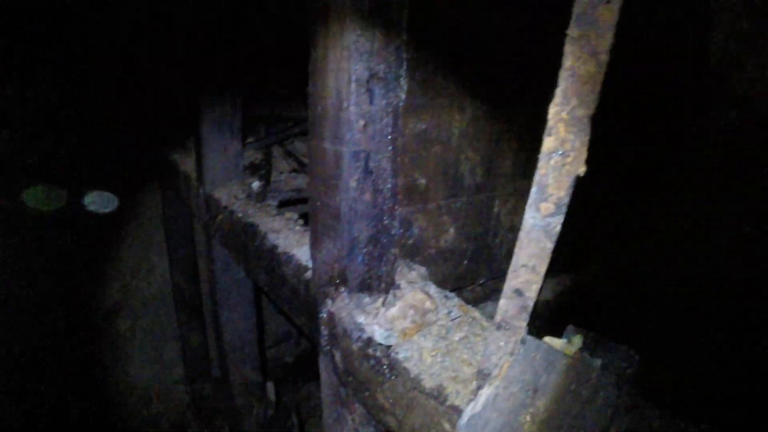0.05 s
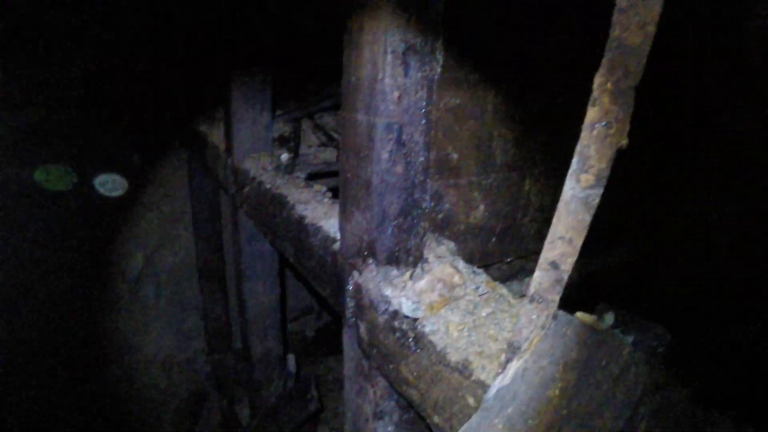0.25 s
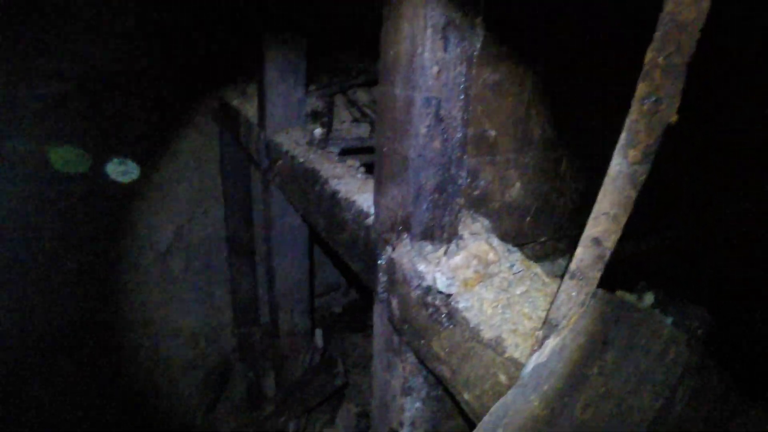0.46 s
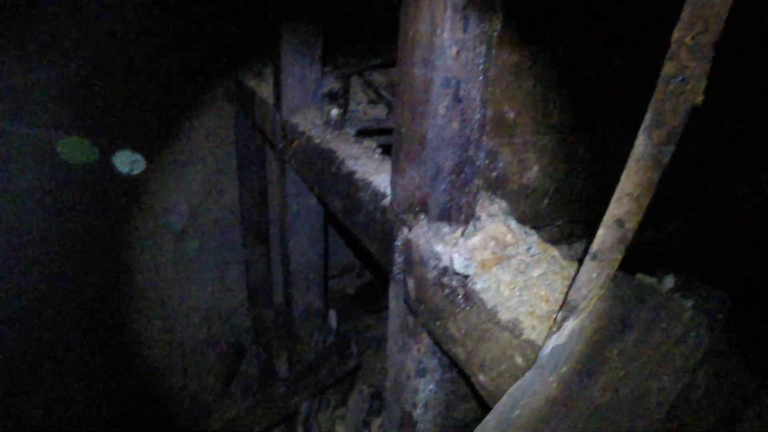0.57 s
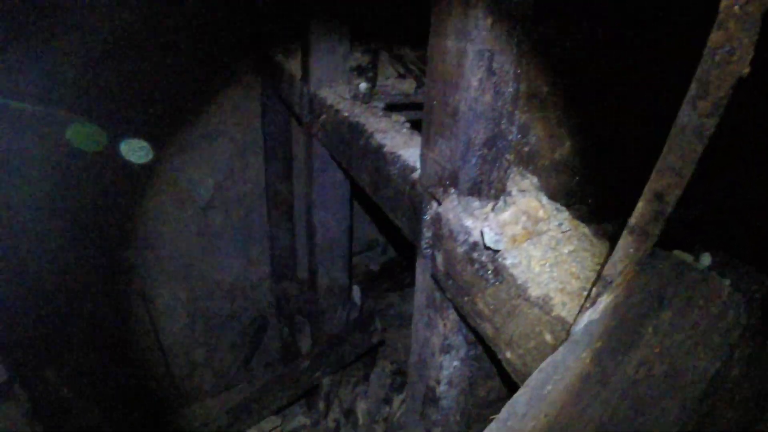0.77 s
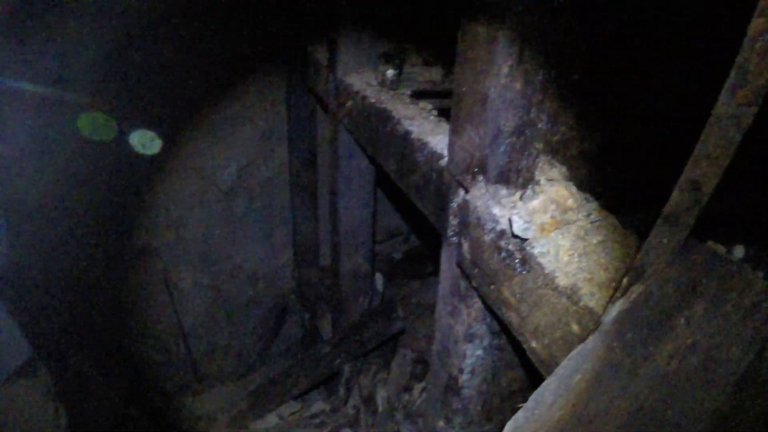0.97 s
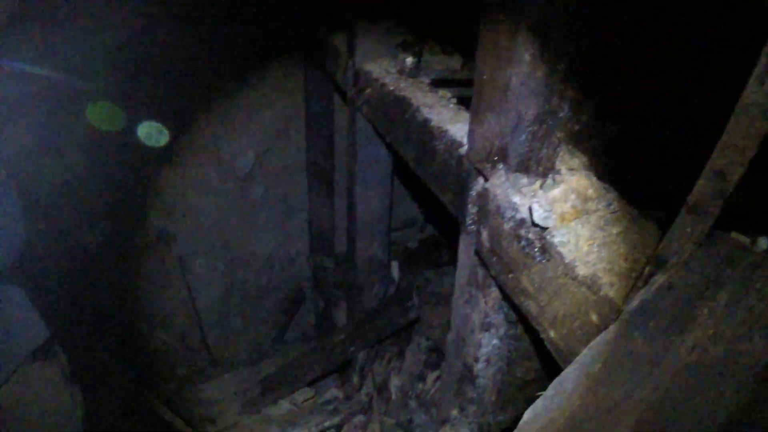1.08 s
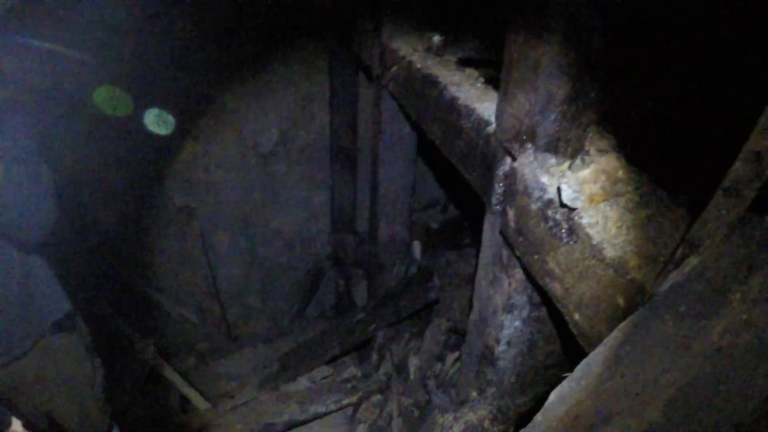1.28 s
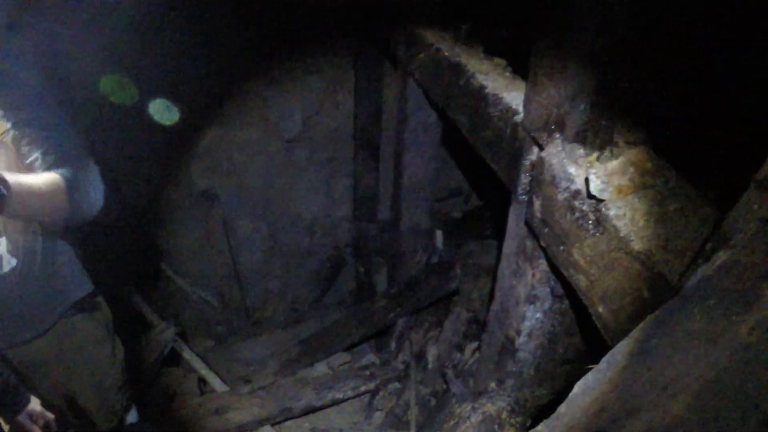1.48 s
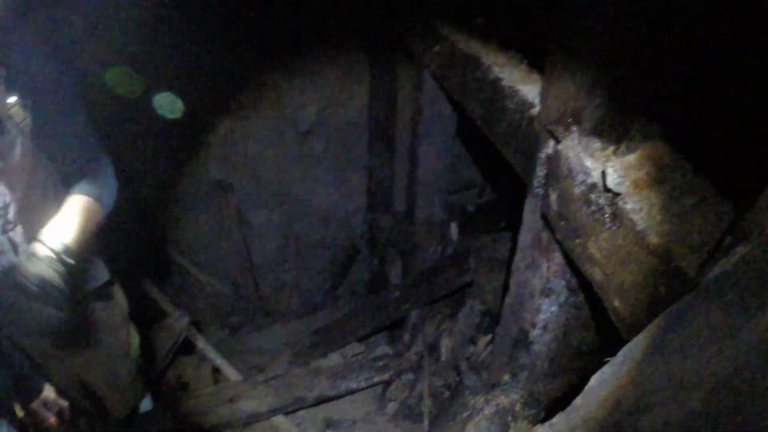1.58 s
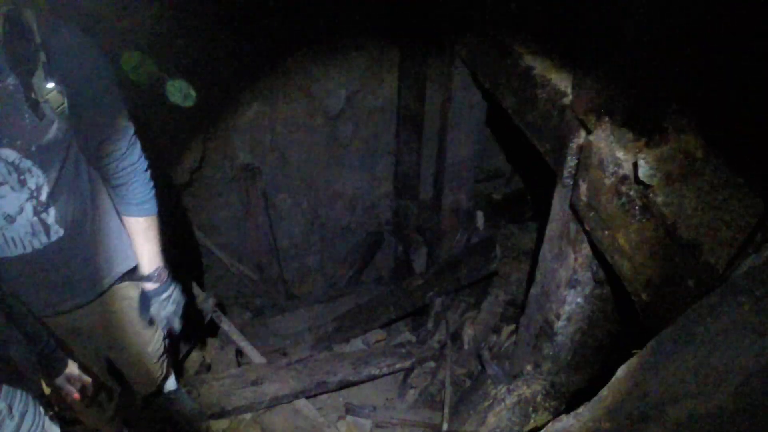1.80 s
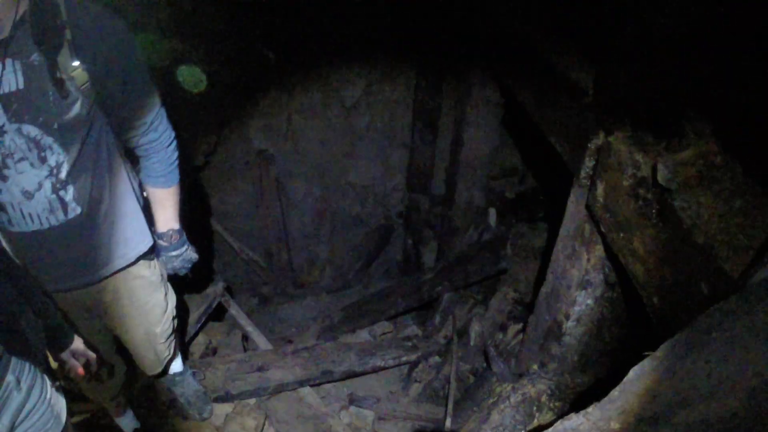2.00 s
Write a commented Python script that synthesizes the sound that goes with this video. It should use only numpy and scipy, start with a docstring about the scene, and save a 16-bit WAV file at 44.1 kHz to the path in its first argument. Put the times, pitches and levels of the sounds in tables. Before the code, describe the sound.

Soft, dull thumps of steps and handling bump a hand-held microphone in a still mine chamber. They fall at about 0.2, 0.4, 0.6, 1.1 and 1.8 seconds, the strongest at 0.6. A low shuffling rumble and faint grit scuffs swell near 0.5 seconds, with a few tiny dry clicks scattered around. Quiet hiss, a thin stuttering electrical buzz and a very faint high whine run throughout.

```python
"""Soft dull thumps, probably steps and handling, pass through the body of a hand-held camera
in a still, timbered mine chamber; each is the response of a heavily damped resonator to a push.
A low shuffling rumble swells with the movement, with faint scuffs of grit and a few dry clicks.
Under them lie steady microphone hiss, a thin, stuttering electrical buzz and a faint high whine."""
import sys
import numpy as np
from scipy import signal
from scipy.fft import rfft, irfft
from scipy.io import wavfile

SR = 44100
rng = np.random.default_rng(int(sys.argv[2]) if len(sys.argv) > 2 else 0)


def output_pcm(signal):
    """Save a mono or channel-first signal as 16-bit PCM at the path in sys.argv[1].

    Samples are clipped to [-1, 1] before scaling.
    """
    pcm = np.clip(np.atleast_2d(signal).T, -1, 1) * 32767
    wavfile.write(sys.argv[1], SR, np.round(pcm).astype(np.int16))


N = 90404
T = np.arange(N) / SR


def from_db(db):
    """Decibels to amplitude ratio."""
    return 10 ** (np.asarray(db) / 20)


def rms_one(x):
    """Normalisation to unit rms."""
    return x / np.sqrt(np.mean(x ** 2) + 1e-20)


def cut(x, hz, kind, order):
    """Butterworth low- or high-pass filtering."""
    return signal.sosfilt(signal.butter(order, min(hz, .45 * SR), kind, fs=SR, output="sos"), x + 1e-18)


def noise(spectrum):
    """Spectral shaping: white noise takes on a given colour, at unit rms."""
    hz, db = np.transpose(spectrum)
    bin_hz = np.maximum(np.arange(N // 2 + 1) * SR / N, 1)
    gain = from_db(np.interp(np.log(bin_hz), np.log(hz), db))
    return rms_one(irfft(rfft(rng.standard_normal(N)) * gain, N))


def rumble():
    """Amplitude modulation: low-frequency noise swells with the movement."""
    # envelope of the rumble: (time [s], level [dB])
    envelope = [(0, -60), (.27, -58.5), (.38, -55), (.52, -50), (.7, -58.5), (.85, -57.5), (1.05, -61.5),
                (1.19, -54), (1.4, -63.5), (1.62, -59.5), (1.8, -56), (2.05, -58)]
    # spectrum of the rumble: (frequency [Hz], relative spectral density [dB])
    spectrum = [(12, -2.5), (30, 1.5), (60, -5), (120, -11), (250, -14.5), (500, -25.5), (1200, -63.5)]
    return from_db(np.interp(T, *np.transpose(envelope))) * noise(spectrum)


def hiss():
    """Stationary broadband noise: the microphone's own floor, weaker towards the treble."""
    # spectrum of the hiss: (frequency [Hz], relative spectral density [dB])
    spectrum = [(150, 1), (300, -1), (550, -2), (800, -4.5), (1500, -6.5), (2900, -11.5), (5000, -16.5),
                (7000, -19.5), (8500, -24.5), (10500, -25.5), (11800, -26), (13000, -30), (14400, -36.5),
                (15000, -36)]
    return from_db(-61.5) * noise(spectrum)


def buzz():
    """A pulse train: square electrical ticks with fizzing edges stutter as their period slips."""
    period_s, late_s, early_gap_s, jitter_s = .01189, .0018, .0033, .00005
    width_s, fizz_decay_s = .000421, .0006
    size, timing, width, choice = rng.standard_normal((N // 200, 4)).T
    run_lengths = rng.integers(3, 8, len(size))
    slips = np.isin(np.arange(len(size)), np.cumsum(run_lengths))
    slip_gaps = np.where(choice > 0, early_gap_s, period_s + late_s)  # an extra early tick or a late one
    gaps = np.where(slips, slip_gaps, period_s) + jitter_s * timing
    starts = np.cumsum(gaps) - gaps[0]
    latest = np.searchsorted(starts, T, side="right") - 1
    age = T - starts[latest]
    widths = width_s * (1 + .11 * width)
    ticks = from_db(-47 + 1.5 * size[latest]) * np.clip((widths[latest] - age) * SR, 0, 1)
    ticks = cut(cut(ticks, 160, "high", order=1), 3280, "low", order=1)
    fizz = cut(cut(rng.standard_normal(N), 6500, "high", order=2), 12900, "low", order=6)
    return ticks + from_db(-67.5) * np.exp(-age / fizz_decay_s) * rms_one(fizz)


def whine():
    """Random frequency modulation: faint tones from the electronics waver slightly."""
    # tones of the electronics: (frequency [Hz], level [dB])
    tones = [(11386, -92), (14147, -91), (14207, -86.5)]
    width_hz = 10
    out = 0
    for hz, db in tones:
        waver = rms_one(cut(rng.standard_normal(N), width_hz, "low", order=2))
        out = out + from_db(db) * np.sin(2 * np.pi * np.cumsum(hz + width_hz * waver) / SR)
    return out


def clicks():
    """Broadband transients: tiny dry cracks decay exponentially within milliseconds."""
    # dry cracks: (time [s], level [dB])
    cracks = [(0.1721, -54.5), (0.2007, -49.5), (0.825, -54.5), (1.5441, -56), (1.9295, -59)]
    decay_s = .0018
    envelope = sum(from_db(db) * (T >= s) * np.exp(-np.abs(T - s) / decay_s) for s, db in cracks)
    band = cut(cut(rng.standard_normal(N), 450, "high", order=1), 2600, "low", order=2)
    return envelope * rms_one(band)


def thumps():
    """Damped oscillation: each soft push rocks the camera body for a cycle or so."""
    # pushes on the body: (time [s], peak level [dB], contact softness [ms], natural frequency [Hz])
    pushes = [(0.1995, -34, 0.5, 36.6), (0.354, -48, 2.5, 79), (0.4039, -31.5, 2.85, 95),
              (0.419, -39, 3.7, 45), (0.436, -41.5, 2.0, 70.5), (0.522, -46, 1.3, 56),
              (0.579, -44.5, 3.7, 54.5), (0.5955, -22, 0.83, 189), (0.6066, -32.5, 0.98, 67),
              (0.707, -45, 3.8, 55), (1.087, -39.5, 2.04, 42.7), (1.1264, -27, 2.8, 68),
              (1.13, -35.5, 0.49, 108), (1.308, -43, .5, 70), (1.650, -43.5, 0.8, 89),
              (1.657, -40, 1.2, 48.5), (1.675, -35.5, 1.7, 70), (1.7605, -26.5, 0.93, 59)]
    body_q, housing_hz = 1.16, 616
    housing = signal.iirpeak(housing_hz, Q=4, fs=SR)  # a hollow resonance
    out = np.zeros(N)
    for s, db, soft_ms, hz in pushes:
        scaled_age = np.maximum(T - s, 0) * 1000 / soft_ms
        force = scaled_age ** 2 * np.exp(-np.minimum(scaled_age, 60))
        omega = 2 * np.pi * hz
        body = signal.bilinear([1, 0, 0], [1, omega / body_q, omega * omega], SR)
        rock = signal.lfilter(*body, force)
        rock = rock + from_db(-1.5) * signal.lfilter(*housing, rock)
        rock = cut(cut(rock, 754, "low", order=6), 5.3, "high", order=1)
        out += from_db(db) * rock / np.abs(rock).max()
    return out


def scuffs():
    """Friction noise: short rubs of grit excite a band that rises quickly and dies away."""
    # rubs of grit: (time [s], level [dB], decay time [s], centre frequency [Hz], bandwidth [octaves])
    rubs = [(0.542, -55, 0.017, 1570, 0.69), (0.591, -56.5, 0.016, 1860, .14),
            (0.627, -70, 0.036, 1870, 0.56), (1.791, -64, 0.024, 1900, 0.3)]
    attack_s = .0032
    out = 0
    for s, db, decay_s, hz, octaves in rubs:
        age = np.maximum(T - s, 0)
        envelope = np.minimum(age / attack_s, 1) * np.exp(-age / decay_s)
        edge_ratio = 2 ** (octaves / 2)
        grit = cut(rng.standard_normal(N), hz * edge_ratio, "low", order=10)
        grit = cut(grit, hz / edge_ratio, "high", order=10)
        out = out + from_db(db) * envelope * rms_one(grit)
    return out


def scene():
    """Superposition: the sounds of movement add to the electronic floor, in mono."""
    return (thumps() + scuffs() + clicks() + rumble() + hiss() + buzz() + whine())[None]


def record(dry):
    """Band limiting: a steep elliptic low-pass removes the highest treble."""
    cutoff_hz = 15000
    return signal.sosfilt(signal.ellip(10, .1, 70, cutoff_hz, fs=SR, output="sos"), dry)


dry = scene()
out = record(dry)
output_pcm(out)
```